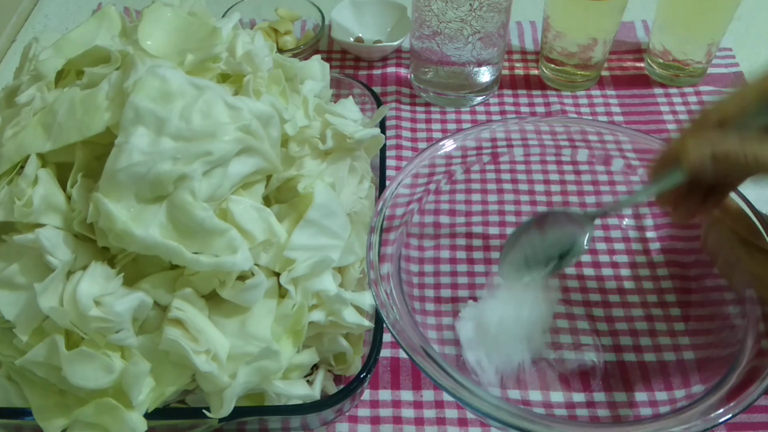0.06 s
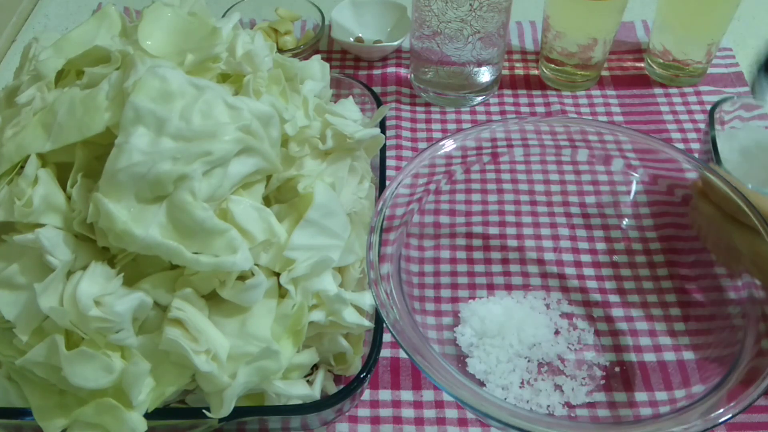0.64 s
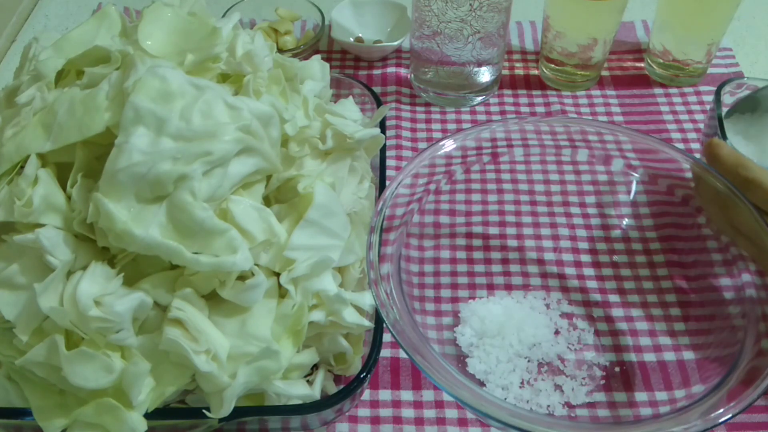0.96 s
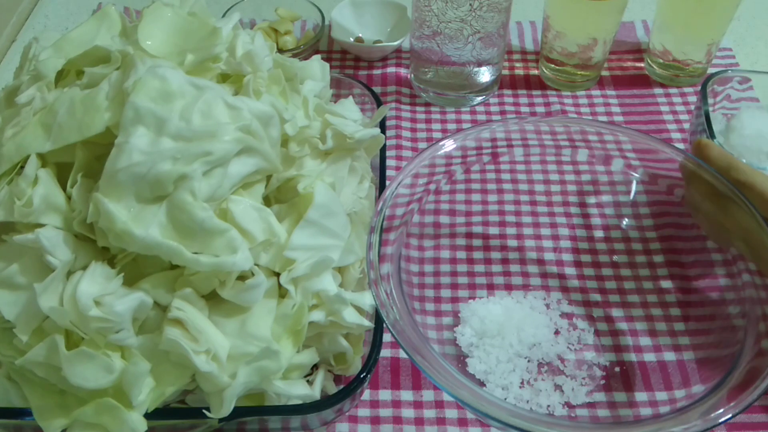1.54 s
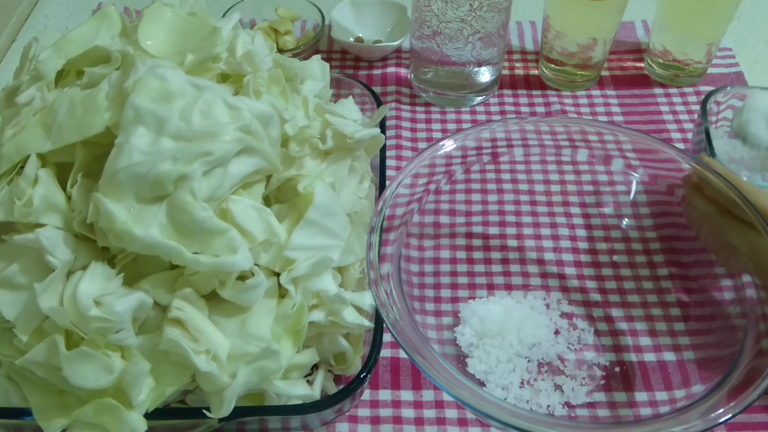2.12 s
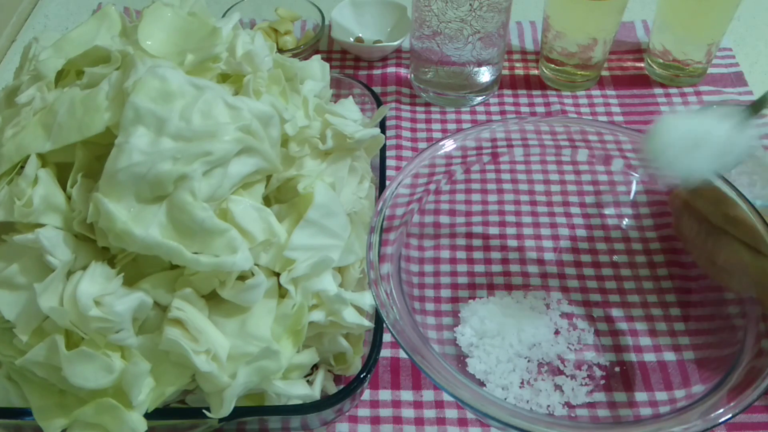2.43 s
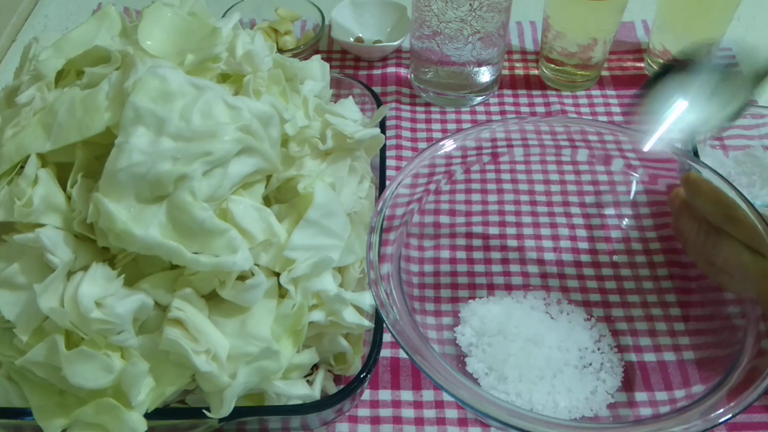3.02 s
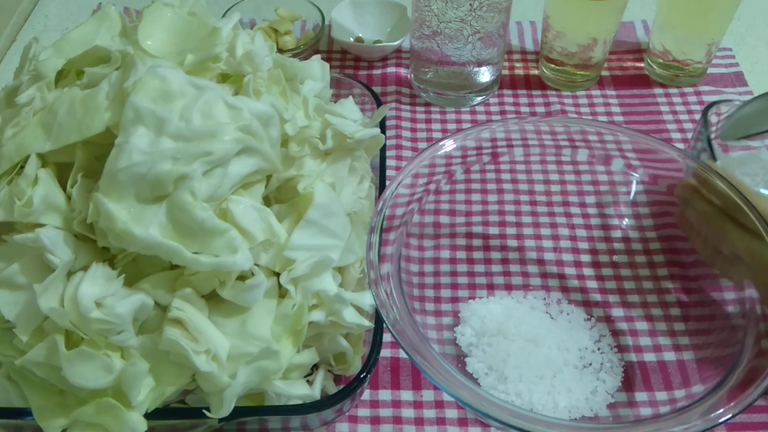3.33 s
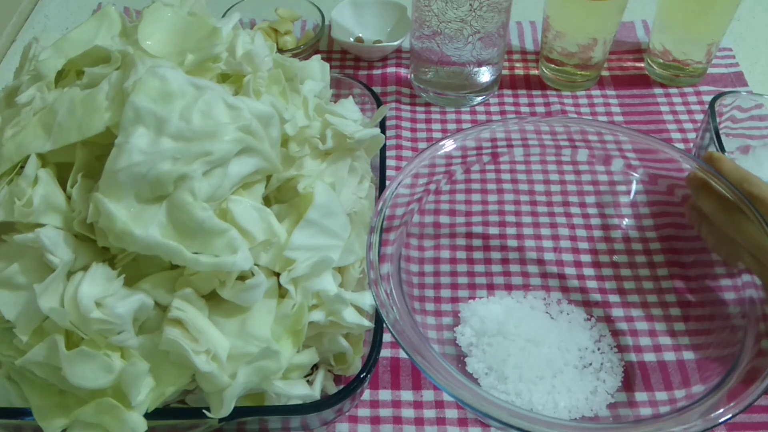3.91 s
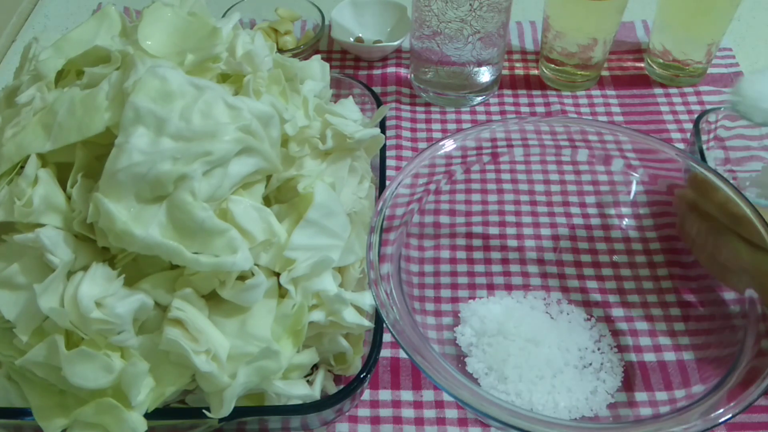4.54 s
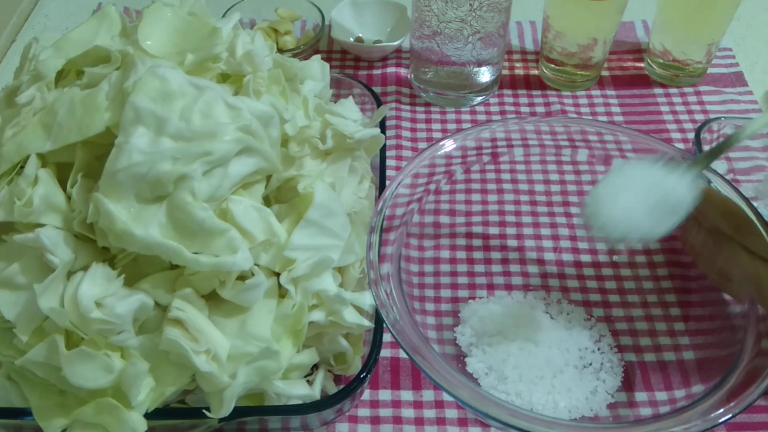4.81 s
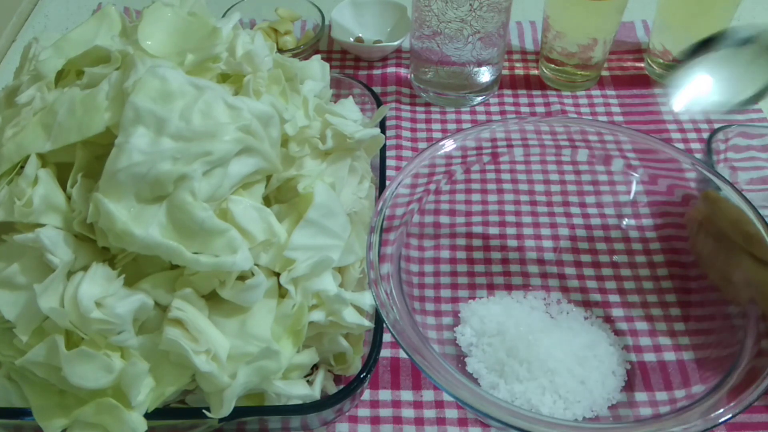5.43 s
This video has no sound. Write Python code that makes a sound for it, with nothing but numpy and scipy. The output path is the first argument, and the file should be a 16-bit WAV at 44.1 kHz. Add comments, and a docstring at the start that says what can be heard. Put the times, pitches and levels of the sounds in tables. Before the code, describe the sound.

Right at the start, coarse salt slides off a steel spoon into a glass bowl with a brief, bright hiss and a soft patter. From about 0.8 to 1.3 seconds the spoon crunches into salt in a glass jar, with a sharp, damped clink at 1 second and a lighter one at 1.3. Loose crystals trickle faintly around 1.6 seconds, and a few very faint, thin squeaks come and go in the first three seconds. A second spoonful hisses onto the heap at about 2.6 seconds. From 3.3 to 3.8 seconds the spoon digs again, with gritty scraping and a quick cluster of clinks, the loudest near 3.5, then a light tap just after 4. A third, softer pour comes around 4.9 to 5.1 seconds. Everything sounds close, in a small kitchen with slight reverberation, a quiet low rumble and faint hiss.

```python
"""Coarse salt hisses off a steel spoon and patters on the heap in a glass bowl. Twice more the spoon
digs into a hand-held glass jar, clinking and crunching, and tips out another spoonful.
The salt is a swarm of tiny random impacts; each clink is the damped ringing of the jar's modes.
Faint squeaks come between the scoops, and a small kitchen reverberates over a low rumble."""
import sys
import numpy as np
from scipy import signal
from scipy.fft import rfft, irfft, next_fast_len
from scipy.io import wavfile
from scipy.ndimage import map_coordinates

SR = 44100
rng = np.random.default_rng(int(sys.argv[2]) if len(sys.argv) > 2 else 0)


def digitize_waveform(pressure):
    """Quantize a signal to 16-bit integers and store it at the path in sys.argv[1].

    Rows of a 2-D input are taken as channels; values are limited to [-1, 1].
    """
    field = np.atleast_2d(pressure).T
    bounded = np.clip(field, -1, 1)
    quanta = np.round(bounded * 32767).astype(np.int16)
    wavfile.write(sys.argv[1], SR, quanta)


N = 250047


def amp(db):
    """Amplitude ratio of a level in decibels."""
    return 10 ** (np.asarray(db) / 20)


def unit(x):
    """Normalisation to rms 1."""
    return x / np.sqrt(np.mean(x ** 2) + 1e-20)


def pan(x, left_db):
    """Level difference between the channels: left exceeds right by left_db."""
    return x * amp([[left_db / 2], [-left_db / 2]])


def along(points, hz):
    """Interpolation of (frequency, value) points on a logarithmic axis."""
    f, v = np.transpose(points)
    return np.interp(np.log(hz + 1), np.log(f + 1), v)


def curves(rows):
    """Linear interpolation in time: one value per sample for each later column."""
    times, *columns = np.transpose(rows)
    return [np.interp(np.arange(N) / SR, times, column) for column in columns]


def stroke(start, length, db, swell_db, rise, fall):
    """Envelope of a movement: exponential rise and fall [dB/s] around a hold that swells or ebbs."""
    gain = np.zeros(N)
    near = np.arange(max(int((start - .5) * SR), 0), min(int((start + length + .5) * SR), N))
    t = near / SR - start
    held_db = db + swell_db * (np.clip(t / length, 0, 1) - .5)
    gain[near] = amp(held_db - rise * np.maximum(-t, 0) - fall * np.maximum(t - length, 0))
    return gain


def filtered(x, response):
    """Zero-phase filtering: the spectrum is multiplied by response(hz)."""
    n = x.shape[-1]
    padded = next_fast_len(n + 8192)
    return irfft(rfft(x, padded) * response(np.fft.rfftfreq(padded, 1 / SR)), padded)[..., :n]


def below(hz, edge_hz, order=16):
    """Magnitude response of a steep low-pass."""
    return 1 / (1 + (hz / edge_hz) ** order)


def coloured(x, spectrum):
    """Spectral shaping by (frequency [Hz], level [dB]) points, at rms 1."""
    return unit(filtered(x, lambda hz: amp(along(spectrum, hz))))


def resonate(x, modes, direct_db):
    """Forced response: modal peaks add in power, and a direct path fills the valleys."""
    def response(hz):
        peaks = sum(amp(2 * db) / (1 + (1.24 * (hz - centre) / width) ** 2) ** 2
                    for centre, width, db in modes)
        return np.sqrt(peaks + amp(2 * direct_db))
    return filtered(x, response)


def wander(x, depth_db, width_bins=0.98, frames=9):
    """Spectral modulation: shifting contact points change the colour in narrow, brief patches."""
    z = signal.stft(x, nperseg=512)[2]
    grid = np.meshgrid(np.arange(z.shape[1]) / width_bins, np.arange(z.shape[2]) / frames, indexing="ij")
    patches = map_coordinates(rng.standard_normal(z.shape[1:]), grid, mode="wrap")
    gain = amp(depth_db * np.minimum(patches, 1.3))
    return unit(signal.istft(z * gain, nperseg=512)[1][:, :N])


def crystals(per_s, spread_db, life_s=0.0026):
    """Shot noise: random impacts of uneven size, each a decaying burst, unlike in left and right."""
    impacts = (rng.random(N) < per_s / SR) * amp(spread_db * np.clip(rng.standard_normal(N), -2, 2))
    energy = signal.lfilter([1], [1, -np.exp(-1 / (life_s * SR))], impacts ** 2)
    return unit(np.sqrt(energy) * rng.standard_normal((2, N)))


def flow(grains, movements, rise, fall, body_hz=6500, sizzle_hz=10000):
    """Granular flow: movements add in power; a thick stream has more body, a thin one more sizzle."""
    body = unit(filtered(grains, lambda hz: below(hz, body_hz)))
    hiss = unit(filtered(grains, lambda hz: below(hz, sizzle_hz) - below(hz, body_hz)))
    sizzle = unit(filtered(grains, lambda hz: 1 - below(hz, sizzle_hz)))
    power = np.zeros((3, N))
    for start, length, db, swell_db, body_db, sizzle_db, *_ in movements:
        fine = stroke(start, length, db, swell_db, rise, fall)
        heavy = stroke(start, length, db + body_db, swell_db, rise, 1.5 * fall)  # big grains stop first
        power += np.square([heavy, fine, amp(sizzle_db) * fine])
    return sum(gain * band for gain, band in zip(np.sqrt(power), (body, hiss, sizzle)))


# Likeness of left and right: (frequency [Hz], coherence [0-1])
COHERENCE = [(50, 0.98), (130, .8), (280, .4), (700, 0), (2000, 0.012), (15000, 0)]
def diffuse_noise(spectrum):
    """Diffuse field: the channels are coherent in the bass and independent in the treble."""
    def mid_and_side(hz):
        angle = np.arccos(along(COHERENCE, hz)) / 2
        return np.array([np.cos(angle), np.sin(angle)])
    mid, side = filtered(rng.standard_normal((2, N)), mid_and_side)
    return coloured(np.array([mid + side, mid - side]), spectrum)


# Room hiss: (frequency [Hz], level [dB])
AIR_SPECTRUM = [(150, -26.5), (250, -7), (414, -9), (831, -11.5), (890, -12.5), (1380, -14), (2200, -14.5),
                (2620, -13), (3340, -17), (11700, -19), (16000, -19.5)]
def room_hiss():
    """Stationary broadband noise, faint and diffuse."""
    return amp(-69) * diffuse_noise(AIR_SPECTRUM)


# Room rumble: (frequency [Hz], level [dB])
RUMBLE_SPECTRUM = [(12, -45), (20, -20.5), (43, -1.5), (65, 1.5), (93, -3), (119, -5), (150, -4.5),
                   (206, -16), (264, -23.5), (353, -24), (400, -40.5), (520, -62.5), (880, -120)]
# Its two bands: (time [s], deep level [dB], upper level [dB])
RUMBLE_LEVELS = [(0.0, -63, -62), (1.2, -62, -72.5), (2.3, -61.5, -64.5), (3.2, -61.5, -69.5),
                 (4.0, -68.5, -72.5), (5.67, -64, -76.5)]
# Dull bumps: (time [s], duration [s], level [dB])
LOW_BUMPS = [(0.054, 0.027, -56), (0.726, 0.037, -56.5), (1.637, 0.23, -54), (2.84, 0.067, -59),
             (3.041, 0.018, -51.5), (3.151, 0.043, -56.5), (5.497, 0.17, -53.5)]
def rumble(split_hz=110, waver_db=5, waver_per_s=9):
    """Amplitude-modulated low noise: the deep band swells in dull bumps, the upper band wavers."""
    deep = filtered(diffuse_noise(RUMBLE_SPECTRUM), lambda hz: below(hz, split_hz) - below(hz, 33, 6))
    upper = filtered(diffuse_noise(RUMBLE_SPECTRUM), lambda hz: 1 - below(hz, split_hz))
    deep_db, upper_db = curves(RUMBLE_LEVELS)
    bumps = sum(stroke(*bump, swell_db=0, rise=489, fall=300) for bump in LOW_BUMPS)
    waver = map_coordinates(rng.standard_normal(1024), [np.arange(N) * waver_per_s / SR])
    return np.hypot(amp(deep_db), bumps) * unit(deep) + amp(upper_db + waver_db * waver) * unit(upper)


# Kitchen reverberation: (frequency [Hz], 60 dB decay time [s])
KITCHEN_T60 = [(300, 0.097), (2500, 0.18), (7000, 0.23), (15000, 0.27)]
def kitchen(x):
    """Reverberation: convolution with a noise tail in which each frequency decays at its own rate."""
    hz, t, z = signal.stft(rng.standard_normal((2, SR // 2)), SR, nperseg=256)
    decay = amp(-60 * t / along(KITCHEN_T60, hz)[:, None])
    tail = signal.istft(z * decay, SR, nperseg=256)[1]
    tail = np.pad(tail, ((0, 0), (SR // 200, 0)))  # the walls answer after 5 ms
    return signal.fftconvolve(x, tail / np.linalg.norm(tail[0]), axes=1)[:, :N]


# Noise that drives the squeaks: (frequency [Hz], level [dB])
SQUEAK_SPECTRUM = [(1000, -13), (2000, 0.5), (3200, 0), (4200, -7.5), (7000, -2.5), (12000, -19.5)]
# Thin squeaks: (time [s], duration [s], level [dB], pitch [Hz])
SQUEAKS = [(0.668, 0.2, -64.5, 2590), (1.489, 0.072, -61, 2666), (2.435, 0.065, -61.5, 2550),
           (2.862, 0.018, -65, 3110)]
def squeaks(width_hz=250):
    """Narrow-band resonance: noise excites one mode, at a slightly different pitch each time."""
    out = np.zeros((2, N))
    noise = wander(diffuse_noise(SQUEAK_SPECTRUM), depth_db=5)
    for start, length, db, pitch_hz in SQUEAKS:
        narrow = unit(resonate(noise, [(pitch_hz, width_hz, 0)], direct_db=-15.5))
        out += stroke(start, length, db, swell_db=0, rise=700, fall=280) * narrow
    return amp(-1) * out


# Settling crystals: (frequency [Hz], level [dB])
SETTLING_SPECTRUM = [(1500, -26), (4000, -24), (6000, -15), (7300, -13.5), (8500, -1), (10500, -20),
                     (12000, -3.5), (14000, 7.5), (16000, -4.5)]
# Trickles: (time [s], duration [s], level [dB], swell [dB], body [relative dB], sizzle [relative dB])
SETTLINGS = [(1.534, 0.05, -65, 0.5, -2, 9.5), (1.595, 0.06, -62.5, -6, -1, 7),
             (3.985, 0.07, -59.5, -4.5, -23, -2), (4.345, 0.02, -60, -7.5, -22, -2.5)]
def settling():
    """Light granular flow: loose crystals come to rest on the lifted spoon."""
    grains = coloured(crystals(per_s=3100, spread_db=2.5), SETTLING_SPECTRUM)
    return amp(-2.5) * flow(wander(grains, depth_db=4.5), SETTLINGS, rise=702, fall=281.5)


# Modes of the salt-damped jar and the spoon in it: (frequency [Hz], bandwidth [Hz], level [dB])
JAR_MODES = [(374.4, 220, -3.5), (880, 140, -5), (1149, 240, 4), (1329, 39, 6.5), (1528, 83, 3.5),
             (2113, 120, -16), (2303, 51, -8), (2380, 91, -7.5), (2840, 150, -5.5), (4360, 170, 4),
             (4480, 200, -5), (4855, 70, 3.5), (5050, 230, -1.5), (6015, 350, 2), (7370, 330, 3.5),
             (7720, 200, 2), (8500, 200, -0.5), (10100, 3400, -2), (11520, 300, -7), (12440, 110, 5.5),
             (13854, 125, 8), (14890, 500, 0)]
def jar_ringing(t, spot_hz, t60, snap_db, lift_db=8, reach_octaves=0.12):
    """Damped free vibration after a snap: the point of impact favours the modes near spot_hz."""
    modes = []
    for hz, width, db in JAR_MODES:
        favour_db = lift_db * np.exp(-(np.log2(hz / spot_hz) / reach_octaves) ** 2)
        shifted_hz = hz * (1 + 0.0054 * rng.standard_normal())  # grip and salt detune each blow
        modes.append((shifted_hz, width, db + favour_db + 3 * rng.standard_normal()))
    rattle = unit(resonate(rng.standard_normal((2, len(t))), modes, direct_db=-16))
    tones = unit(sum(amp(db) * np.sin(2 * np.pi * (hz * t + rng.random((2, 1)))) for hz, _, db in modes))
    snap = amp(snap_db - 60 * t / 0.011)
    decay = amp(-60 * t / t60) + amp(-9 - 60 * t / (1.8 * t60))  # a weaker part lingers
    return rattle * (snap + decay) + amp(-13) * tones * decay


# Edges of the thud, knock, ring, clink and tick bands: (frequency [Hz])
BAND_EDGES = [230, 740, 1800, 3700, 9000, 17000]
# Spoon on jar; deep contacts knock, those near the rim ring, those through salt tick: (time [s],
# clink level [dB], knock, ring and tick [dB re clink], favoured frequency [Hz], 60 dB decay time [s])
CONTACTS = [(0.815, -51, -10, 4, 9, 2400, .05), (0.922, -52.5, -25, -25.5, 6, 7400, .02),
            (1.0326, -26.5, -8, -13.5, -6, 1343, 0.07), (1.3331, -39.5, -28, -2.5, -8.5, 2080, 0.092),
            (2.35, -61.5, -30, -35, -15, 7300, .012), (3.2819, -43.5, -2, 3, -5, 1130, 0.072),
            (3.344, -60.5, -17, -18, 16, 13000, .08), (3.401, -52.5, -7, -7, 10, 12930, 0.028),
            (3.4158, -34.5, -5, -10, 0, 1450, 0.072), (3.4816, -28, -14, -3, -2.5, 2330, .1),
            (3.6687, -50.5, -1.5, -3, 2, 900, 0.062), (3.817, -58.5, -34, -31, -6, 7400, .02),
            (3.845, -69, -22, -25, 9.5, 8340, .014), (3.9832, -67, -25, -23, 3, 8500, 0.027),
            (4.0669, -45, -24, -4, -7.5, 2430, 0.09)]
def clinks(thud_db=-25, build_cycles=5):
    """Impact excitation: the spoon strikes the jar, and the harder the blow, the stronger its snap."""
    out = np.zeros((2, N + SR))
    t = np.arange(SR // 3) / SR
    hardest_db = max(row[1] for row in CONTACTS)
    for start, clink_db, knock_db, ring_db, tick_db, spot_hz, t60 in CONTACTS:
        strike = jar_ringing(t, spot_hz, t60, snap_db=12.5 + 1.5 * (clink_db - hardest_db))
        colour_db = (knock_db + thud_db, knock_db, ring_db, 0, tick_db)
        for lo, hi, db in zip(BAND_EDGES, BAND_EDGES[1:], colour_db):
            build_up = 1 - np.exp(-t * hi / build_cycles)  # low bands build up later
            band = build_up * filtered(strike, lambda hz: below(hz, hi) - below(hz, lo))
            attack_rms = np.std(band[:, :SR // 40])
            out[:, round(start * SR):][:, :len(t)] += amp(clink_db + db) * band / attack_rms
    return amp(2) * out[:, :N]


# Shearing crystals: (frequency [Hz], level [dB])
CRUNCH_SPECTRUM = [(2000, -30.5), (3600, -16.5), (4300, -11), (5500, -8), (7500, -5), (9500, -6.5),
                   (12000, -2.5), (15500, -3)]
# Pushes through the salt: (time [s], duration [s], level [dB], swell [dB],
# body [relative dB], sizzle [relative dB], grinding [relative dB])
PUSHES = [(0.82, 0.082, -53.5, 1, -2.5, 4.5, -10.5), (0.921, 0.1, -43, 6.5, -4, 2.5, -14),
          (1.075, 0.18, -51, -7.5, -0.5, 4, -4), (3.345, 0.045, -51.5, 1.5, -5, 8, -17),
          (3.39, 0.14, -44, 4.5, -8, 0.5, -14), (3.5, 0.17, -43.5, 0.5, -2.5, 3.5, -14.5),
          (3.74, 0.094, -62.5, 8, -11.5, -2, -33)]
def crunching():
    """Granular shear: crystals slip past the spoon and each other."""
    grains = coloured(crystals(per_s=1700, spread_db=4.2), CRUNCH_SPECTRUM)
    shearing = wander(grains, depth_db=6.5, width_bins=2, frames=6.7)
    return amp(1) * flow(shearing, PUSHES, rise=1203, fall=302.5)


# Salt ground on glass: (frequency [Hz], level [dB])
GRIND_SPECTRUM = [(300, -26), (650, -22.5), (850, -9), (1250, -1.5), (1900, -8), (2400, 4), (3000, -1),
                  (3400, -10.5), (6000, -40.5)]
def grinding(swell_ratio=1.8):
    """Friction: crystals under the spoon's tip drive the jar's modes, more so as it presses."""
    glass = resonate(crystals(per_s=1700, spread_db=1), JAR_MODES, direct_db=4.5)
    pressure = sum(stroke(start, length, db + grind_db, swell_ratio * swell_db, rise=1203, fall=302.5)
                   for start, length, db, swell_db, _, _, grind_db in PUSHES)
    return amp(0.5) * pressure * coloured(glass, GRIND_SPECTRUM)


# Salt landing on salt: (frequency [Hz], level [dB])
PATTER_SPECTRUM = [(100, -27), (250, -2.5), (420, -18.5), (660, 2.5), (850, -4.5), (1100, -18),
                   (2500, -12.5), (4000, -23)]
# The bulk of each spoonful arriving: (time [s], duration [s], level [dB])
HEAP_LANDINGS = [(0.005, 0.0359, -59.5), (2.664, 0.015, -55.5), (4.975, 0.032, -62.5)]
def pattering():
    """Inelastic impacts: crystals land dully on the heap."""
    landing = sum(stroke(*row, swell_db=0, rise=400, fall=405) for row in HEAP_LANDINGS)
    return amp(1) * landing * coloured(crystals(per_s=1200, spread_db=7.5), PATTER_SPECTRUM)


# Modes of spoon and bowl: (frequency [Hz], bandwidth [Hz], level [dB])
BOWL_MODES = [(4454, 140, -7.5), (5200, 220, -3.5), (5270, 320, 5), (5900, 170, -3), (7780, 230, 5.5),
              (7750, 90, -3.5), (8180, 110, 2.5), (9070, 240, 4.5), (9200, 160, 8.5), (9500, 61, -9.5),
              (10450, 380, 0), (11310, 120, 10), (11700, 180, 1), (12970, 220, 8), (13810, 120, -2),
              (13400, 110, -3.5), (14260, 140, -3.5), (14520, 130, -5.5), (15150, 200, -5.5),
              (16000, 160, -4.5)]
# How freely the bowl rings: (time [s], share of power [0-1])
RINGING_SHARE = [(0, .85), (2.7, .5), (4.9, .1)]
# Sliding salt: (frequency [Hz], level [dB])
SLIDE_SPECTRUM = [(400, -42.5), (1500, -34), (3400, -27), (4300, -13), (5100, -5.5), (6500, -1),
                  (8000, 0.5), (10000, -1.5), (15500, -1)]
# Gushes off the spoon, ending in stragglers:
# (time [s], duration [s], level [dB], swell [dB], body [relative dB], sizzle [relative dB])
POURS = [(0.0, 0.04, -32.5, -8, 0, -1), (0.075, 0.035, -42.5, -5, -11, -1.5),
         (0.18, 0.012, -71, -1, -10, 7.5), (2.523, 0.08, -55, 20, -2.5, 8.5),
         (2.619, 0.03, -37.5, -1.5, -1.5, 6.5), (2.657, 0.018, -30, -8, -3.5, -2.5),
         (2.712, 0.06, -57, -14, -24, 0.5), (4.843, 0.055, -53.5, 7, -4, 5),
         (4.909, 0.022, -44.5, -2.5, -4, 9), (4.95, 0.034, -41, 7, -4, 2.5),
         (5.04, 0.031, -50.5, 0.5, -28, 7.5), (5.125, 0.0093, -68, -2, -22, 11)]
def pouring():
    """Modal excitation by grains: skidding salt rings spoon and bowl; the growing heap damps them."""
    ringing = resonate(crystals(per_s=2700, spread_db=2.5), BOWL_MODES, direct_db=-20.5)
    damped = crystals(per_s=2500, spread_db=4, life_s=0.0005)
    share = curves(RINGING_SHARE)[0]
    grains = np.sqrt(share) * coloured(ringing, SLIDE_SPECTRUM)
    grains += np.sqrt(1 - share) * coloured(damped, SLIDE_SPECTRUM)
    skidding = wander(grains, depth_db=6, width_bins=2, frames=12)
    return amp(-0.5) * flow(skidding, POURS, rise=2200, fall=380)


# Stereo balance of the spoon, salt and glass: (frequency [Hz], left minus right [dB])
BALANCE = [(1000, -2), (3000, 0.5), (5200, 3.5), (8000, 1), (11000, -5.5), (15000, -2.5)]
def scene(room_db=-9):
    """Superposition of direct sound, reverberation and background; each band leans to one side."""
    direct = pan(pouring(), -0.5) + pattering()
    direct += pan(crunching() + settling(), 1.5) + grinding()
    direct += squeaks() + pan(clinks(), 1)
    in_room = direct + amp(room_db) * kitchen(direct)
    heard = filtered(in_room, lambda hz: amp(np.outer([.5, -.5], along(BALANCE, hz))))
    return heard + rumble() + room_hiss()


def record(dry, top_hz=15800):
    """Band limiting: an ideal low-pass removes everything above top_hz."""
    return filtered(dry, lambda hz: hz < top_hz)


dry = scene()
out = record(dry)
digitize_waveform(out)
```